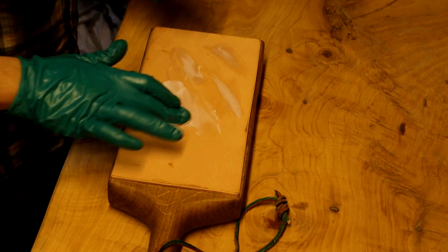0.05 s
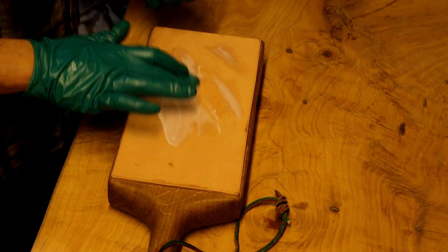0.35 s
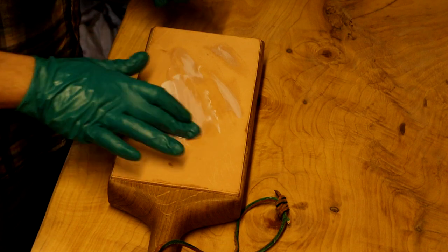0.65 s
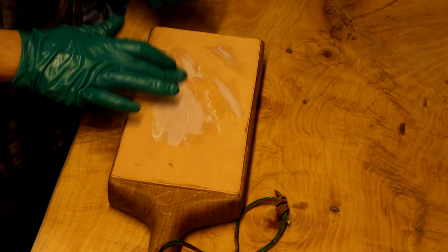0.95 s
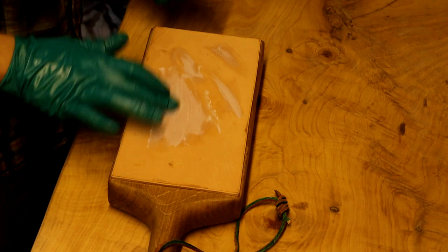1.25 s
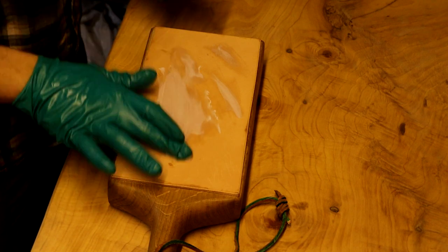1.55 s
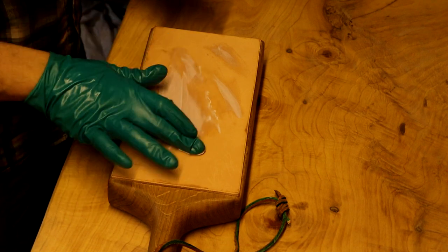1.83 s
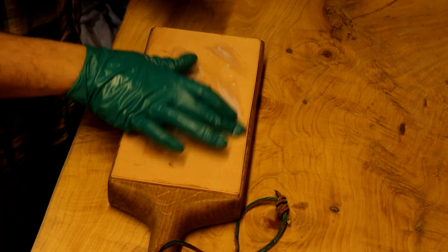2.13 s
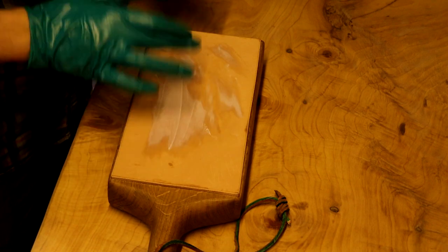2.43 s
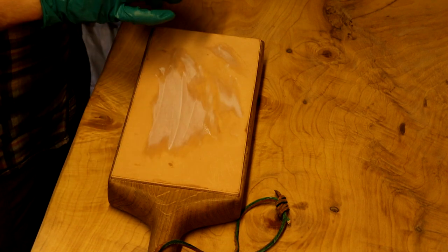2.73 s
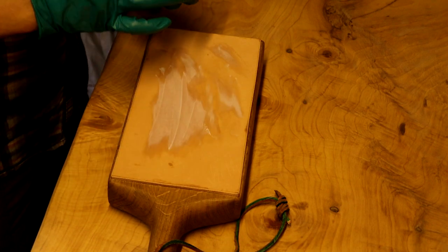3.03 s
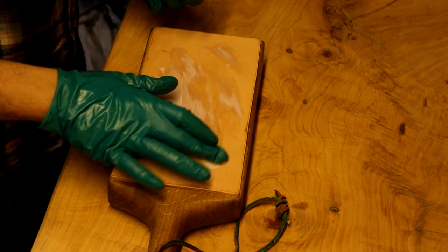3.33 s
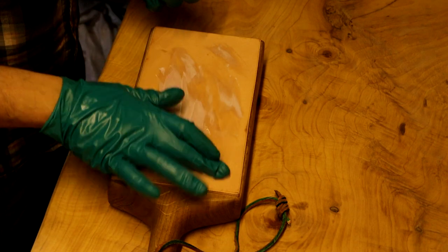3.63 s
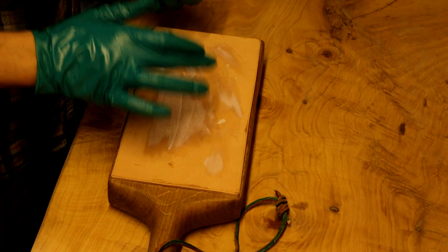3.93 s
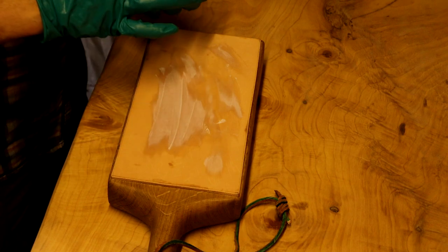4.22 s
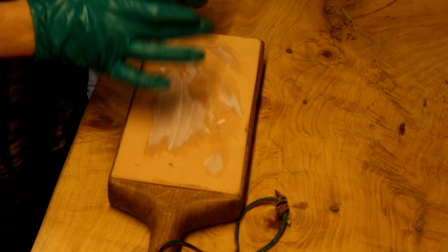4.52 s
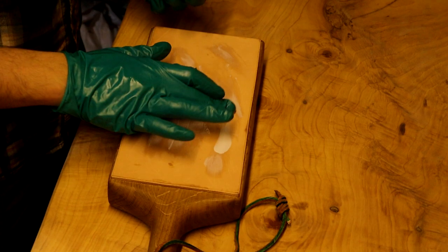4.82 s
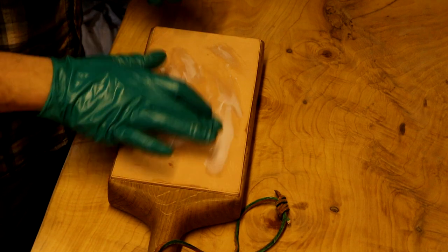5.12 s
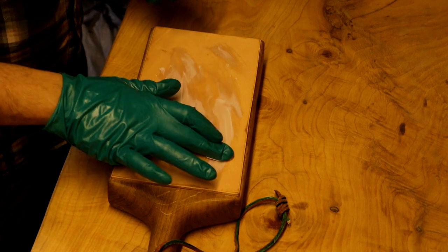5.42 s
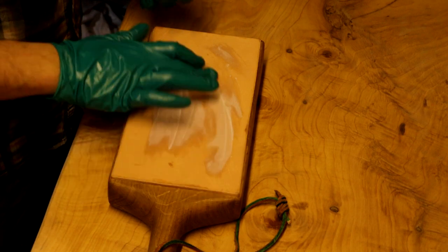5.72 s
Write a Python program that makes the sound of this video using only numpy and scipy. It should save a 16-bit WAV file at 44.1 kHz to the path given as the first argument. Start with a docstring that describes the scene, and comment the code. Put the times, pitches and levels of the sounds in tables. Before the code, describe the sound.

Gloved fingers rub abrasive paste into a leather strop, heard close in a small workshop with little echo. From the start, quick back-and-forth strokes, about nine a second, make a bright, gritty scuff, rasping as the glove catches and hissing as it slides. They are strongest from about 1 second and stop at 2.4 seconds. A brief, lighter bout runs from 3.3 to 3.9 seconds. After another pause, the rubbing resumes at 4.8 seconds and grows firmer until the end, near 5.9 seconds. The hand bumps the wooden paddle with soft, low knocks at about 2.2, 3.4 and 4.7 seconds. Tiny wet ticks of paste and glove parting are scattered between 1.7 and 4 seconds. Underneath throughout lie a faint, slightly wavering distant engine drone, mains hum, soft room air and a very thin, high electrical whine.

```python
"""Small workshop: gloved fingers rub abrasive paste into a leather strop, three bouts of quick strokes.
Grit catches and slips: a rasp as the glove drags, a scuff under pressure, a hiss at full speed.
The hand bumps the strop's paddle now and then; paste and glove tick as they part.
Behind: a distant engine's drone, mains hum, room air and a thin electrical whine."""
import sys
import numpy as np
from scipy import signal
from scipy.fft import rfft, irfft
from scipy.io import wavfile

SR = 44100
rng = np.random.default_rng(int(sys.argv[2]) if len(sys.argv) > 2 else 0)


def pcm_store(signal):
    """Save signal as 16-bit PCM."""
    levels = np.round(np.clip(np.atleast_2d(signal), -1, 1) * 32767)
    wavfile.write(sys.argv[1], SR, levels.astype(np.int16).T)


N = 258558
TIME_S = np.arange(N) / SR
FREQ_HZ = np.maximum(np.arange(N // 2 + 1) * SR / N, 1)

# hand strokes: start/s, end/s, base scuff level/dB, bite lift/dB, push lift/dB,
# push position/stroke length, hiss offset/dB
STROKES = [(-0.064, 0.051, -37, 1, 6, 0.5, -6), (0.035, 0.122, -46.0, 18, 0, 0.72, -5.5),
           (0.111, 0.186, -36.5, -3, 2, 0.72, -10), (0.192, 0.312, -48, 22, 16.5, 0.57, -5.5),
           (0.287, 0.398, -41.5, 19.5, 11, 0.71, -1), (0.404, 0.507, -40, 17.5, 15, 0.73, -2.5),
           (0.509, 0.604, -35, 7, 13, 0.9, -0.5), (0.614, 0.709, -32.5, 10.5, 2.5, 0.74, -5.5),
           (0.692, 0.801, -38.5, 2, 5.5, 0.71, -9.5), (0.8, 0.887, -39.5, 12, 6.5, 0.68, 0),
           (0.879, 0.993, -39.5, 12, 12.5, 0.8, -4.0), (1.003, 1.129, -45, 25, 21, 0.7, -6),
           (1.13, 1.246, -41, 19.5, 14.5, 0.79, -3), (1.255, 1.392, -43.0, 24.5, 18, 0.63, -4.5),
           (1.393, 1.517, -41.5, 22, 17.5, 0.83, 0.5), (1.523, 1.648, -36.5, 15.5, 12.5, 0.77, -2.5),
           (1.653, 1.778, -39, 20, 10.5, 0.7, 2), (1.783, 1.907, -33.0, 13.5, 9.5, 0.81, -3.0),
           (1.915, 2.04, -36, 10.5, 9, 0.74, 4), (2.038, 2.164, -34.5, 12.5, 4.5, 0.63, 4),
           (2.165, 2.259, -35.5, 7, 11.5, 0.87, 7), (2.268, 2.393, -36.5, 15, 5.5, 0.52, 1.5),
           (2.377, 2.435, -32, 2, 3.5, 0.62, -10), (3.348, 3.458, -50.5, 1, 10.5, 0.41, -5.0),
           (3.436, 3.511, -40.5, -0.5, 4.5, 0.76, -1.0), (3.513, 3.614, -35, 0.5, 6.5, 0.83, 2),
           (3.626, 3.718, -32.5, 4, 5.5, 0.82, 0.5), (3.729, 3.845, -34.5, 2.5, 5, 0.9, 4),
           (3.835, 3.885, -53.5, 10, 10.5, 0.86, -7), (4.761, 4.854, -37.5, 3.5, 3.5, 0.7, -3.5),
           (4.863, 4.977, -38.0, 7.5, 5.5, 0.9, -1), (4.986, 5.153, -38.5, 12.5, 5.5, 0.4, -1.5),
           (5.129, 5.256, -31, 3, 1.5, 0.7, -2), (5.255, 5.359, -34.5, 1, 14, 0.97, -0.5),
           (5.371, 5.474, -36.0, 7, 3.5, 0.66, -1), (5.478, 5.576, -37, 8, 6, 0.77, -3.5),
           (5.579, 5.676, -38, 13.5, 7.5, 0.68, 0.5), (5.682, 5.798, -36.5, 9.5, 13.5, 0.87, 2),
           (5.812, 5.892, -34.5, 11, 9, 0.81, -5.5)]
# friction spectrum of glove, grit and leather: f/Hz, relative level/dB
FRICTION_SPECTRUM = [(500, -53), (900, -28), (1300, -17.5), (1550, -20), (1900, -8), (2700, -4.5),
                     (3300, 0.5), (4600, -2), (5600, -1.5), (6400, -7), (9000, -11), (12600, -13),
                     (15000, -15), (16000, -26)]
# strop and glove resonances: f/Hz, width/Hz, lift/dB
STROP_RESONANCES = [(1932, 51, 2), (3710, 520, 6.5), (5280, 640, 4.5), (7300, 830, 1), (9530, 320, 2.5),
                    (10900, 290, 3)]
# hand bumps on the paddle: t/s, level/dB
BUMPS = [(2.169, -44), (3.351, -39), (4.737, -46)]
# modes of the paddle on the bench: f/Hz, relative level/dB, t60/s
PADDLE_MODES = [(124.6, 0, 0.31), (172, 7.5, 0.15), (189.6, -1, 0.2), (286, -8, 0.075)]
# wet paste ticks: t/s, initial level/dB, f/Hz, t60/s
PASTE_TICKS = [(1.696, -38, 850, .045), (2.372, -44, 2600, .006), (3.122, -49, 3700, .018),
               (3.357, -52, 3300, .03), (3.507, -47, 1300, .035), (3.52, -51, 950, .025),
               (4.022, -57, 3600, .05)]
# engine speed: t/s, rotation rate/Hz
ENGINE_SPEED = [(0, 24.1), (.6, 24.8), (1.0, 24.3), (1.4, 23.3), (2.1, 24.8), (2.65, 22.5), (3.05, 22.3),
                (3.55, 26), (3.8, 25.6), (4.1, 24), (4.4, 24), (4.7, 22.5), (5.86, 22.6)]
# engine orders: multiple of rotation rate, base level/dB
ENGINE_ORDERS = [(2, -67.5), (3, -69), (4, -66.5), (5, -65), (6, -63), (7, -62.5), (8, -66.5), (10, -66),
                 (12, -68), (13, -78.5)]
# standing waves of the room: f/Hz, width/Hz, lift/dB
ROOM_MODES = [(72.5, 6, 10), (98, 5, 10), (134, 8, 9)]
# mains harmonics: f/Hz, mean level/dB
MAINS_HARMONICS = [(50, -64), (150, -61), (250, -65), (350, -77), (450, -76), (550, -77), (650, -78)]
# room air and microphone hiss: f/Hz, relative level/dB
AIR_SPECTRUM = [(20, -13), (45, -28), (75, -8.5), (140, -2.5), (210, -11), (320, -11), (550, -17.5),
                (1000, -18), (2000, -22), (5000, -26), (11500, -28.5), (13400, -21.5), (14200, -25),
                (16000, -36)]

BITE_S, BREAK_LOOSE_S = 0.034, 0.0039
STUCK_SHARE, PUSH_HALF_WIDTH_SHARE = 0.097, 0.21  # of the swing; of the stroke
RASP_SPEED_EXP, SCUFF_SPEED_EXP, HISS_SPEED_EXP = 0.4, 1.31, 2.38
SCUFF_REF_DB, RASP_REF_DB, RASP_DB_PER_DB = -31.5, -43.5, 0.45
RASP_TOP_HZ, SCUFF_TOP_HZ = 2544, 6960
GRIP_HZ, GRIP_OCT_PER_DB, GRIP_WANDER_OCT, GRIP_WANDER_HZ = 4195, 0.03, 0.14, 12.5
THRUM_RE_RASP_DB, THRUM_HZ = -12.5, 133


def rubbing():
    """Coarse rasp, scuff and fine hiss pass the same resonances; the drag makes the paddle thrum."""
    body = spectrum_gain(FRICTION_SPECTRUM) * from_db(resonance_db(FREQ_HZ, STROP_RESONANCES))
    low, middle = power_below(RASP_TOP_HZ), power_below(SCUFF_TOP_HZ)
    rasp, scuff, hiss, pressure_db = stroke_envelopes()
    thrum = rasp * from_db(THRUM_RE_RASP_DB) * flutter(THRUM_HZ)
    # stick-slip shakes the coarse band most
    judder = flutter(46)
    rasp *= from_db(0.46 * judder + 1.7 * flutter(24))
    scuff *= from_db(-0.5 + 0.28 * judder)
    hiss *= from_db(2.0 + 0.11 * judder + 0.17 * flutter(50))
    slips = rasp * grit(body * np.sqrt(low), per_s=2500, spread_db=1.8, slide=.8)
    slips += scuff * grit(body * np.sqrt((1 - low) * middle), per_s=5000, spread_db=2.6, slide=.8)
    slips += hiss * grit(body * np.sqrt(1 - middle), per_s=14000, spread_db=2.4, slide=1.1)
    return thrum + grip_and_paste(slips, fingertip_hz(pressure_db))


def stroke_envelopes():
    """Pendulum swing: the glove sticks, breaks loose with a bite, glides, is pushed down again."""
    rasp, scuff, hiss, pressure_db = np.zeros((4, N))
    for start_s, end_s, glide_db, bite_db, push_db, push_at, hiss_db in STROKES:
        on = (TIME_S > start_s) & (TIME_S < end_s)
        age_s = TIME_S[on] - start_s
        progress = age_s / (end_s - start_s)
        swing = np.abs(np.sin(np.pi * (STUCK_SHARE + (1 - STUCK_SHARE) * progress)))
        speed = swing * (1 - np.exp(-age_s / BREAK_LOOSE_S))
        bite = np.exp(-(age_s / BITE_S) ** 2)
        push = np.exp(-((progress - push_at) / PUSH_HALF_WIDTH_SHARE) ** 2)
        scuff_db = glide_db + bite_db * bite + push_db * push
        pressure_db[on] = scuff_db - SCUFF_REF_DB
        rasp[on] += from_db(RASP_REF_DB + RASP_DB_PER_DB * pressure_db[on]) * speed ** RASP_SPEED_EXP
        scuff[on] += from_db(scuff_db) * speed ** SCUFF_SPEED_EXP
        hiss[on] += from_db(scuff_db + hiss_db) * speed ** HISS_SPEED_EXP
    return rasp, scuff, hiss, pressure_db


def grit(gain, per_s, spread_db, slide):
    """Abrasive grains catch and let go: dense uneven clicks over a smooth slide."""
    sizes = from_db(spread_db * np.minimum(rng.exponential(1, N), 4))
    clicks = (rng.random(N) < per_s / SR) * sizes * rng.choice([-1, 1], N)
    return shaped(unit_rms(clicks) + slide * rng.standard_normal(N), gain)


def flutter(rate_hz):
    """Uneven stick-slip around a rate; rms 1."""
    return noise(1 / (1 + (FREQ_HZ / rate_hz - rate_hz / FREQ_HZ) ** 2))


def fingertip_hz(pressure_db):
    """Pressed harder, fingertips stiffen and resonate higher; the grip also wanders."""
    return GRIP_HZ * 2 ** (GRIP_OCT_PER_DB * pressure_db + GRIP_WANDER_OCT * drift(GRIP_WANDER_HZ))


def grip_and_paste(x, grip_hz, lift_db=5.0, width_oct=0.21, patch_db=2.5, patch_s=0.007, patch_hz=197):
    """The fingertip resonance moves with the grip; uneven paste colours the sound in passing patches."""
    bin_hz, frame_s, frames = signal.stft(x, SR, nperseg=256)
    patches = rng.standard_normal(frames.shape)
    for axis, span in enumerate([patch_hz / bin_hz[1], patch_s / frame_s[1]]):
        pole = np.exp(-1 / span)
        patches = signal.filtfilt([1 - pole], [1, -pole], patches, axis=axis, padtype="even")
    offset_oct = np.log2(np.maximum(bin_hz, 1)[:, None] / np.interp(frame_s, TIME_S, grip_hz))
    grip = np.exp(-(offset_oct / width_oct) ** 2)
    gain = from_db(lift_db * (grip - .5) + patch_db * np.clip(unit_rms(patches), -2, 2))
    return signal.istft(frames * gain, SR)[1][:N]


def paddle_bumps(contact_s=0.0088):
    """A soft hand takes a moment to set the paddle's modes ringing."""
    out = np.zeros(N)
    for start_s, bump_db in BUMPS:
        age_s = np.maximum(TIME_S - start_s, 0)
        onset = 1 - np.exp(-age_s / contact_s)
        for hz, mode_db, t60_s in PADDLE_MODES:
            ring = np.sin(2 * np.pi * hz * age_s) * decay(age_s, t60_s)
            out += from_db(bump_db + mode_db) * onset * ring
    return out


def paste_ticks(width_oct=.4):
    """Paste and glove part with short wet noise bursts."""
    out = np.zeros(N)
    for start_s, db, hz, t60_s in PASTE_TICKS:
        age_s = TIME_S - start_s
        burst = noise(1 / (1 + (np.log2(FREQ_HZ / hz) / width_oct) ** 4))
        out += from_db(db) * burst * (age_s > 0) * decay(age_s, t60_s)
    return out


def wall_reverb(x, t60_s=0.32, gap_s=.004, send_db=-14, cutoff_hz=7000):
    """Short diffuse tail from the walls, duller than the direct sound."""
    age_s = TIME_S[:SR // 2]
    tail = rng.standard_normal(len(age_s)) * decay(age_s, t60_s) * (age_s > gap_s)
    tail /= np.sqrt(np.sum(tail ** 2))
    tail = signal.sosfilt(signal.butter(1, cutoff_hz, fs=SR, output="sos"), tail)
    return signal.fftconvolve(from_db(send_db) * x, tail)[:N]


def engine(waver_db=2.5, waver_hz=3.5):
    """Distant engine: orders glide with its speed and boom where they meet a room mode."""
    rotation_hz = np.interp(TIME_S, *np.transpose(ENGINE_SPEED))
    turns = np.cumsum(rotation_hz) / SR
    out = np.zeros(N)
    for order, db in ENGINE_ORDERS:
        boom_db = resonance_db(order * rotation_hz, ROOM_MODES)
        out += from_db(db + boom_db + waver_db * drift(waver_hz)) * tone(order * turns)
    return out


def mains_hum(waver_db=1.2, waver_hz=1.9):
    """Odd mains harmonics, each wavering in level."""
    return sum(from_db(db + waver_db * drift(waver_hz)) * tone(hz * TIME_S) for hz, db in MAINS_HARMONICS)


def room_air(level_db=-54.5):
    """Steady room air and microphone hiss."""
    return from_db(level_db) * noise(spectrum_gain(AIR_SPECTRUM))


def whine(level_db=-75, centre_hz=13350, width_hz=120):
    """Thin electrical whine: a narrow noise band."""
    return from_db(level_db) * noise(peak(FREQ_HZ, centre_hz, width_hz))


def from_db(db):
    return 10 ** (np.asarray(db) / 20)


def unit_rms(x):
    return x / np.sqrt(np.mean(x ** 2) + 1e-20)


def shaped(x, gain):
    """Filter by a gain per frequency; rms 1."""
    return unit_rms(irfft(rfft(x) * gain, N))


def noise(gain):
    """Coloured noise; rms 1."""
    return shaped(rng.standard_normal(N), gain)


def drift(corner_hz):
    """Smooth random wander; rms 1."""
    return noise(1 / (1 + (FREQ_HZ / corner_hz) ** 2))


def tone(cycles):
    """Sine with random start phase; rms 1."""
    return np.sqrt(2) * np.sin(2 * np.pi * (cycles + rng.random()))


def decay(age_s, t60_s):
    """Exponential fall, floor -120 dB."""
    return from_db(-60 * np.clip(age_s / t60_s, 0, 2))


def peak(hz, centre_hz, width_hz):
    """Resonance curve; height 1."""
    return 1 / (1 + (2 * (hz - centre_hz) / width_hz) ** 2)


def resonance_db(hz, modes):
    """Summed lift of the modes."""
    return sum(lift_db * peak(hz, centre_hz, width_hz) for centre_hz, width_hz, lift_db in modes)


def spectrum_gain(points):
    """Gain per frequency from (f/Hz, level/dB) points."""
    hz, db = np.transpose(points)
    return from_db(np.interp(np.log(FREQ_HZ), np.log(hz), db))


def power_below(edge_hz):
    """Power share on a crossover's low side."""
    return 1 / (1 + (FREQ_HZ / edge_hz) ** 12)


def scene():
    """Close hand work over the workshop background; mono."""
    hand = rubbing() + paddle_bumps() + paste_ticks()
    return (hand + wall_reverb(hand) + mains_hum() + room_air() + whine() + engine())[None]


def record(dry, cutoff_hz=15850):
    """Steep low-pass."""
    return signal.sosfilt(signal.ellip(12, .1, 80, cutoff_hz, fs=SR, output="sos"), dry)


dry = scene()
out = record(dry)
pcm_store(out)
```